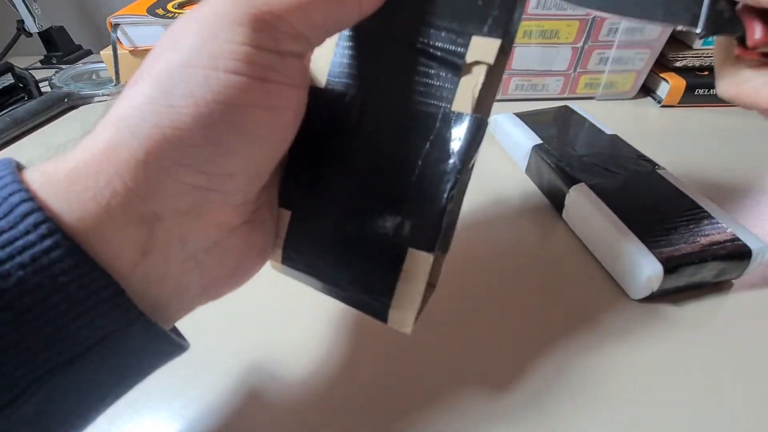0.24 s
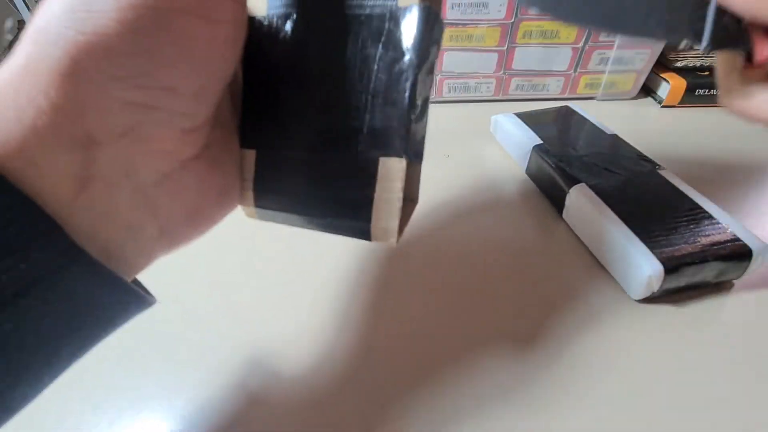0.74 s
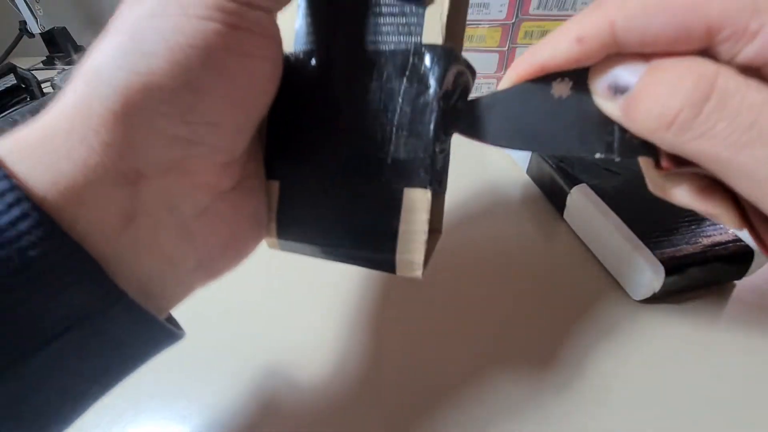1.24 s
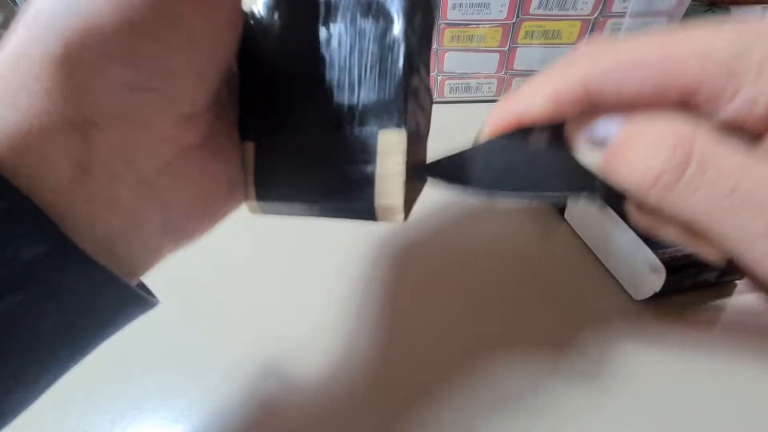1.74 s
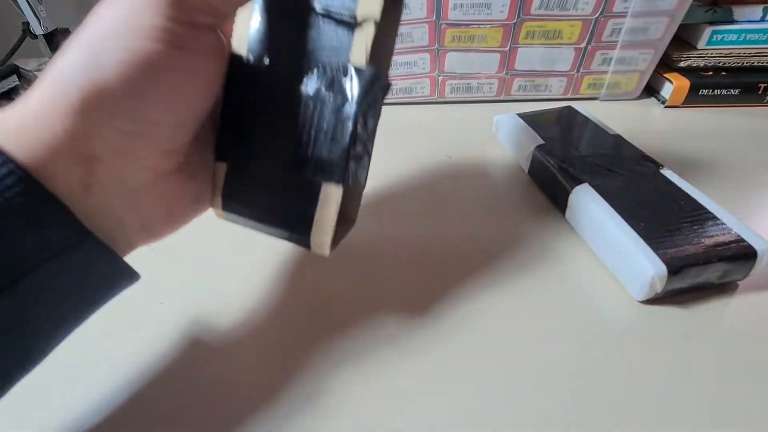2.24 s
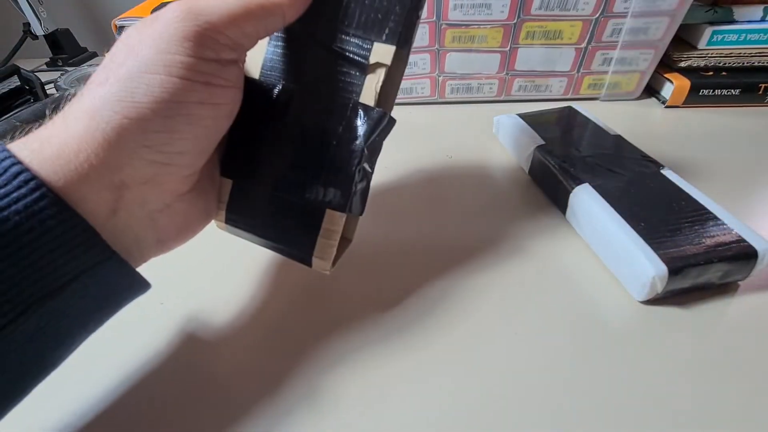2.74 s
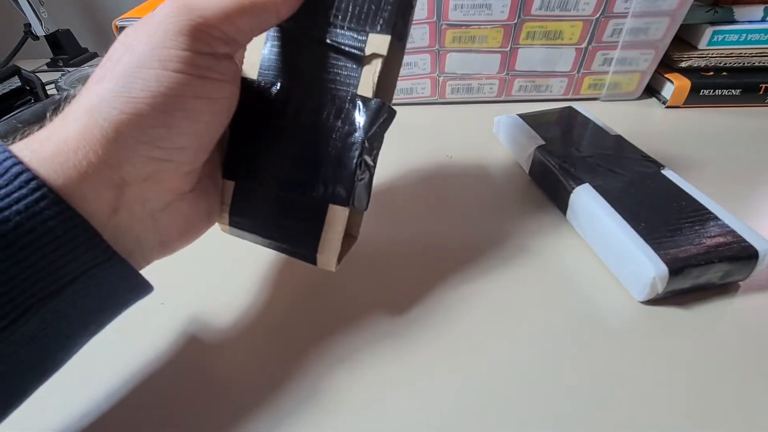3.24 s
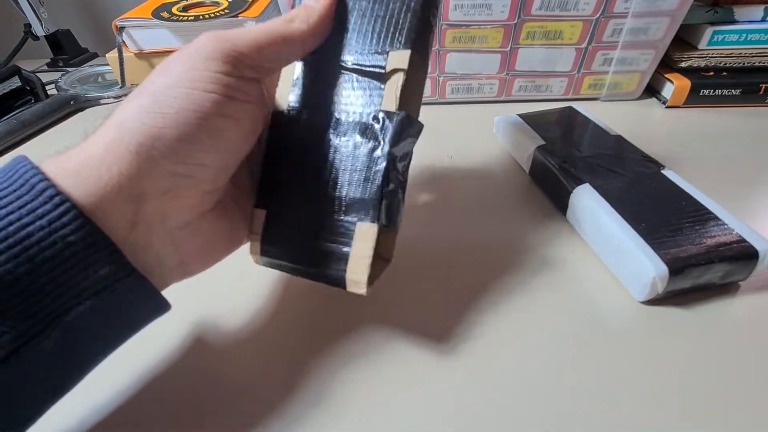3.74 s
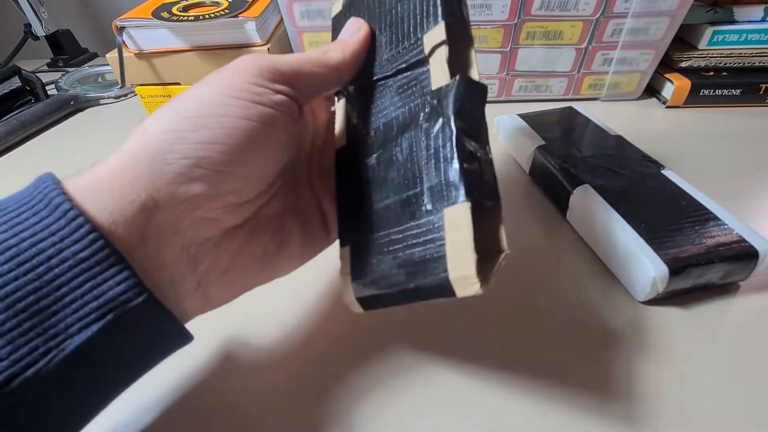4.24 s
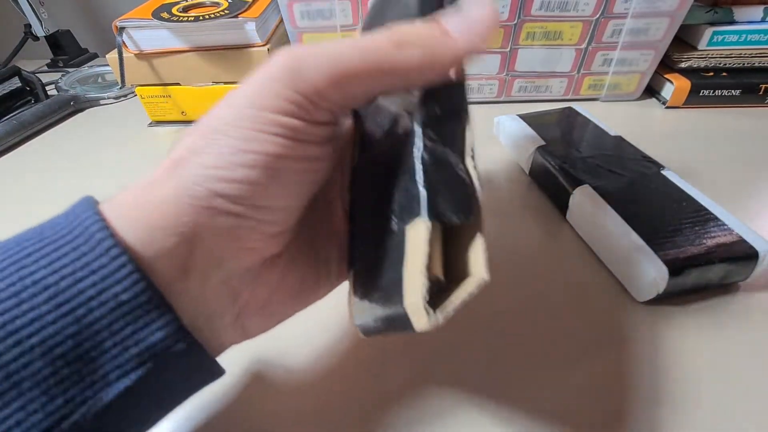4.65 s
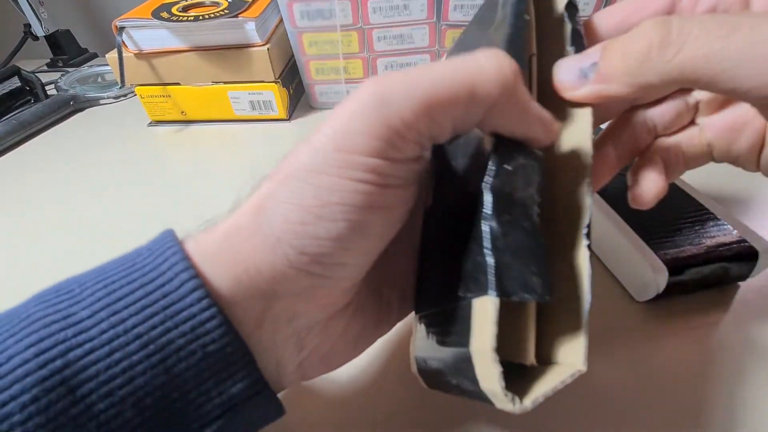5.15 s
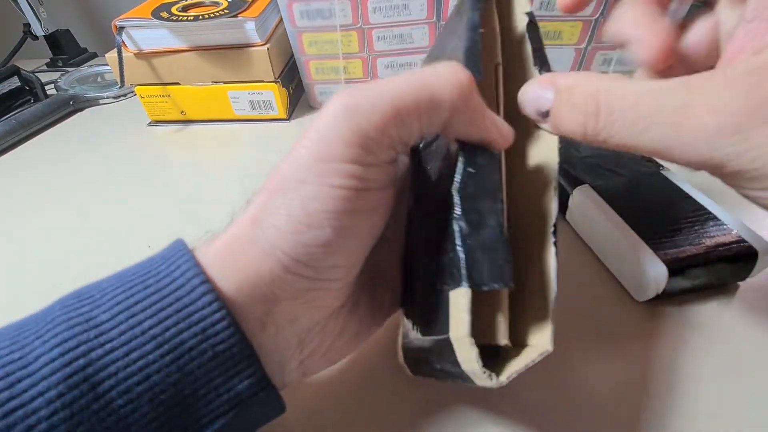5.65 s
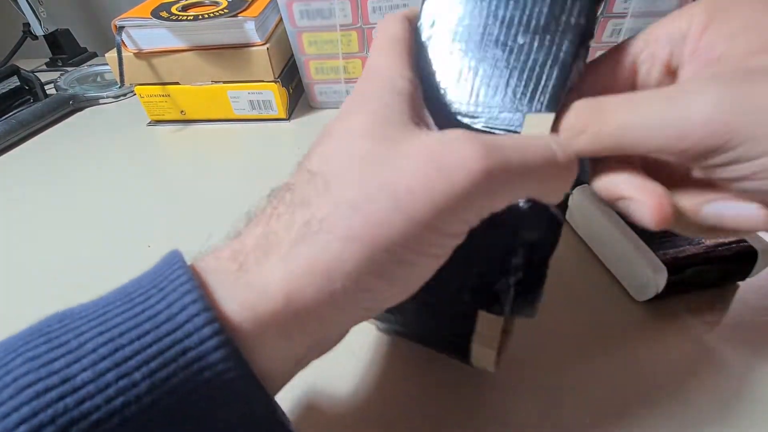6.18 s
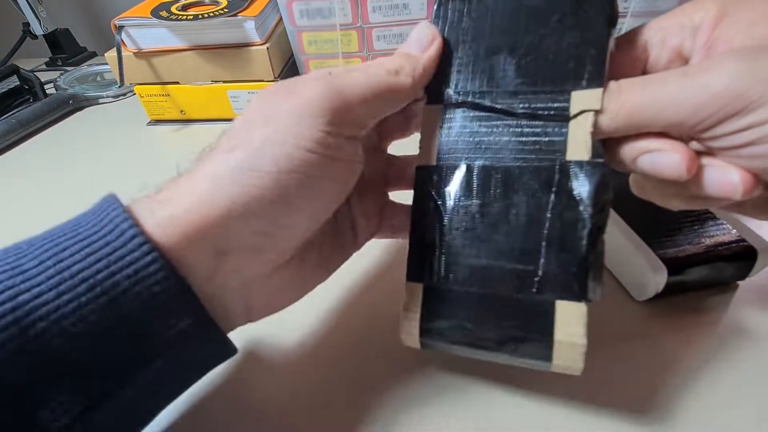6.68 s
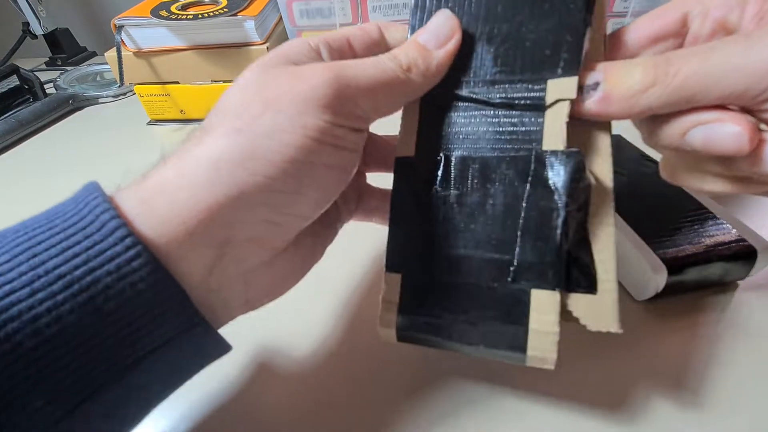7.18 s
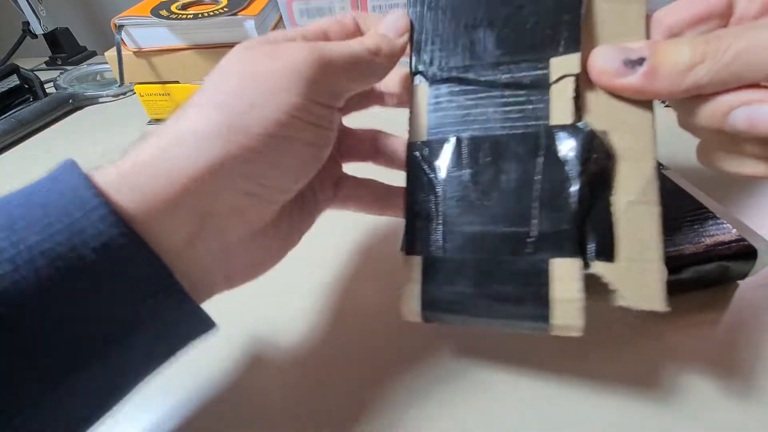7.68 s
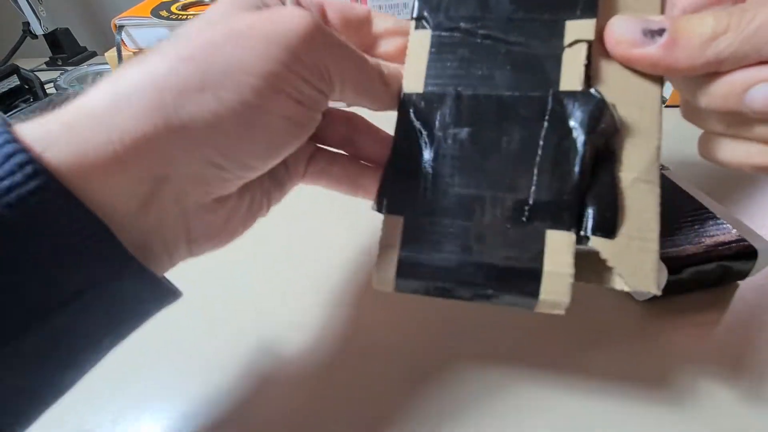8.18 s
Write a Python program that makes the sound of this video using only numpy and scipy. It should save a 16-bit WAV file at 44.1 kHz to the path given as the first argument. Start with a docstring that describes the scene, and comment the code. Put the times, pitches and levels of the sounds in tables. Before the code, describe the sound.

Close to a stereo microphone on a desk in a small room, a blade rips through tape on a cardboard sleeve in short bursts with a low bump. Another tearing stroke follows, then near quiet. A hard knife click and brief plasticky crinkle come next, then loud cracks as the card is pulled open, scratchy finger slides, and a last sharp rip with snaps and fading crackle.

```python
"""Opening a cardboard sleeve

A taped cardboard sleeve is slit with a knife and pulled open by hand, close to a stereo microphone on a desk.
Parting glue and fibres give dense random crackle; lone snaps come from them and from the knife being folded
and put down. Both excite damped resonances. Thin plastic crinkles as crackle weak in the lower panels;
rubs are noise narrowed to one sinking band. Jolts swing the desk as decaying sines; a small room answers
with a tail of noise; faint noise underlies all."""
import sys
import numpy as np
from scipy import signal
from scipy.io import wavfile

SR = 44100
rng = np.random.default_rng(int(sys.argv[2]) if len(sys.argv) > 2 else 0)


def ratio(d):
    """dB to gain"""
    e = np.asarray(d, float) / 20
    return 10 ** e


def unload_wav(signal):
    """Save mono or channel-first audio to the path in sys.argv[1] as 16-bit WAV at rate SR, clipped to [-1, 1]."""
    wavfile.write(
        sys.argv[1],
        SR,
        np.round(np.clip(np.atleast_2d(signal).T, -1, 1) * 32767).astype(np.int16),
    )


N = 371322  # length in samples

# Room air and microphone noise, relative spectral density: f/Hz, level/dB
AIR = [(15, -39), (25, -6), (76, 3.5), (200, -10), (293, -3.5), (560, -29.5), (2110, -27.5), (2610, -24.5),
       (6210, -29.5), (14800, -37.5), (16000, -36.5)]
AIR_DB = -61  # rms of the whole noise

# Lone snaps: t/s, level/dB, card flex re level/dB, tape tick re level/dB, card brightness/(dB per octave)
SNAPS = [(0.008, -33.5, -10.5, -5.5, 1), (0.1126, -36, -21.5, -17, 2.5), (0.215, -19.5, -47, -10.5, 7),
         (0.22, -22, -33, -10.5, -7), (0.232, -19.5, -19.5, -8, 7.5), (0.268, -22, -3.5, -15, -17.5),
         (0.276, -19.5, -8, -10.5, -1.5), (0.299, -39, -10, -23, -12), (0.47, -40.5, -23, -7, -2.5),
         (0.5349, -15.5, -43, -6, 6.5), (0.556, -8, -14, -13, 0), (0.579, -20.5, 1, -8, -8),
         (0.958, -44, -28, -16, -1), (1.21, -25, -26, -12.5, 2), (1.339, -48.5, -26, 3.5, 4),
         (1.472, -39.5, -28, -8, -0.5), (1.535, -44, -15, -13, -0.5), (1.685, -33, -15, -12, -1.5),
         (1.712, -20, -6.5, -8, 5), (1.723, -23.5, -10, -15, -16), (1.752, -15.5, -1, -5, -1.5),
         (1.904, -34, -12.5, -12, -0.5), (2.639, -57, -31, 8, 13), (2.727, -48.5, -42, 4, 16.5),
         (3.194, -21.5, -29.5, 7, 12.5), (3.586, -70, 36, -18.5, 9), (3.698, -2.5, -16, -11, -0.5),
         (3.922, -18, -19, -27, 1.5), (4.53, -43, -22, 1, 1), (4.545, -19.5, -2.5, -11.5, -6),
         (4.7009, -3.5, -14.5, -23, 1), (4.706, -1.5, -17.5, -19.5, 5), (4.7152, -11, -25.5, -5, -7),
         (5.011, -46.5, -30, 16, 12), (5.241, -40, -18, -34, -7), (5.3254, -5.5, -23, -10.5, -3),
         (5.3312, -17.5, -15, -2, 2), (5.436, -7, -12.5, -5, 1.5), (5.841, -24, -12.5, -15.5, -2),
         (5.903, -26, 0.5, -0.5, 7), (6.171, -23.5, 2.5, -3, -1), (6.488, -21, -18, -3, -2),
         (6.541, -24.5, -15, -36, -16), (6.566, -38, -13.5, -25, -15), (6.664, -35, -17.5, -15.5, 1),
         (6.976, -28, -21, -19.5, -0.5), (7.384, -18, -25, -17, -3), (7.422, -8.5, -10, -2, -5),
         (7.492, -4, -24, -5.5, -6), (7.5, -9, -11.5, -7, -2.5), (7.708, -30.5, -21, -14.5, -5.5),
         (7.78, -44.5, 2, -16.5, -6), (7.814, -41.5, -12.5, -10.5, -8.5), (7.874, -40.5, -17.5, -8, -5.5),
         (7.975, -40.5, -26.5, 3, -1), (8.019, -22.5, -17, -1.5, 0), (8.2, -34, -15.5, -16, -6),
         (8.237, -40, -24.5, -28, 12), (8.251, -35, -33, -17, -12), (8.276, -36, -23, -14, -11.5),
         (8.335, -40.5, -16, -5, 3), (8.375, -16, -15, -5, 2.5)]
SNAP_DECAY_MS = 2.91  # time constant of the slips

# Strongly damped card panels: f/Hz, width/Hz, level/dB
CARD = [(734, 171, 1.5), (978, 160, 3), (1219, 200, 1.5), (1490, 230, 1.5), (1740, 290, 3),
        (2130, 1300, -5.5), (3030, 664, 1.5), (3640, 720, -3.5), (4080, 1100, -13)]
# Bending of the sleeve: f/Hz, width/Hz, level/dB
FLEX = [(196, 144, -2.5), (411, 112.6, 1)]
# Skin of the tape: f/Hz, width/Hz, level/dB
FIZZ = [(4400, 3980, -3), (6690, 1700, 1), (8200, 2700, -13), (12800, 1700, -11.5)]

SHARED_POWER = 0.39  # of the crackle, heard alike by both ports; the rest leaves from the face turned to each
FLEX_ALIKE = 0.47  # the sleeve bends as one: share by which its sides are drawn together

# Place of the hands: t/s, lag of left port/samples, left re right level/dB
PLACE = [(0, -5, 4), (1.9, -5, 4.5), (2.2, 20, -6), (3.3, 16, -7), (3.6, 16, 0), (5.2, 16, -1),
         (5.3, -4, 2), (6.6, -3, 0), (8.42, -3, 4)]
SLEEVE_LOW_HZ = 144  # a small sleeve radiates little bass

# Decay of the room by band: f/Hz, T60/s, level/dB
ROOM_TAIL = [(150, 0.14, -7), (470, 0.44, -1.5), (1670, 0.5, -3.5), (3640, 0.25, -3), (8900, 0.058, 9.5)]
ROOM_DB, ROOM_FILL_S = -12, 0.0015

# Cuts, the blade running through tape at an even pull: t of start/s, length/s, crackle level/dB,
# tape fizz re crackle/dB
CUTS = [(0.165, 0.041, -44.5, -9), (0.208, 0.083, -40, -7.5), (0.534, 0.018, -20.5, -10),
        (0.581, 0.033, -26, -8), (0.632, 0.069, -39.5, -14.5)]
CUT_RISE_S, CUT_FALL_S = 0.01, 0.011  # time per 20 dB
# Tears, which jolt the whole sleeve: t of peak/s, crackle level/dB, rise by 20 dB/s, fall by 20 dB/s,
# tape fizz re crackle/dB (rise and fall are held to at least 3 ms)
TEARS = [ (1.178, -38, .09, .016, -11), (1.72, -26, -0.2554, 0.0686, -3), (1.8, -53, 0.23, 0.27, -11.5),
         (4.553, -37, -0.2, 0.3, -28.5), (4.74, -19.5, 0, 0.2, -19.5), (5.47, -44, 0.36, 0.07, -8),
         (5.9, -42, 0, 0.08, -3), (6.55, -56.5, 1.5, 0.4, -8.5), (7.418, -27.5, 0.07, 0.1076, -3),
         (7.53, -46, 0.26, 0.28, -8), (8.02, -51, 0.18, 0.53, -10)]
# Slides of blade or finger along the tape, which hardly bend the sleeve: columns as for the tears
SLIDES = [(0.97, -60, .015, .06, -10.5), (1.03, -62.5, .015, .07, -8.5), (1.545, -56.5, 0.014, 0.054, -8),
          (8.13, -57.5, 0.038, .04, -2.5), (5.05, -52.5, .15, 0.13, -17.5), (5.15, -39, 0.036, 0.022, -6.5),
          (5.38, -49, 0.16, .15, -6), (5.705, -44.5, 0.073, 0.025, -7), (6.0, -46.5, .015, 0.22, -6),
          (6.15, -41, 0.14, 0.28, -8), (6.37, -43.5, 0.2, .06, -11), (6.82, -54, 0.087, 0.053, -8.5),
          (7.05, -41, 0.065, .15, -11.5), (7.18, -28, 0.15, 0.059, -4)]
# Crinkles of thin plastic, weak in the lower panels: columns as for the tears
CRINKLES = [(2.5, -69.5, .6, .7, -1), (3.24, -57, .06, 0.15, 5.5), (3.43, -67.5, 0.087, 0.069, 6),
            (3.75, -22.5, .045, 0.18, -23.5), (3.97, -39.5, .2, 0.5, -21), (4.21, -34, .05, 0.092, -31)]
TEAR_FLEX_DB, SLIDE_FLEX_DB, CRINKLE_FLEX_DB = -7, -18, -16.5  # bending re crackle
CRINKLE_THIN_DB = 6.5  # loss per octave down the lower panels
FIZZ_EXTRA_FALL = 0.74  # extra fall of the fizz, as a share of the crackle's fall
SHOULDER, SLIDE_SHOULDER = 0.91, 1.35  # above 1 the peak of a stroke is rounded

# Jolts into the desk: t/s, level/dB, f/Hz
THUMPS = [(0.289, -42, 53), (0.741, -37.5, 73.4), (1.859, -36, 56.9), (5.99, -44.5, 122.7),
          (8.371, -43.5, 56.4), (0.566, -19, 81.3), (0.599, -22.5, 61.6), (1.19, -35.5, 57.6),
          (1.764, -20.5, 66.5), (4.541, -48, 86), (4.731, -32, 80), (5.435, -41, 109), (5.898, -41, 101),
          (6.291, -38.5, 77), (7.495, -23, 66.3), (7.713, -38, 60.7), (7.999, -36.5, 97)]
THUMP_T60_S, THUMP_LAG_S = 0.24, 0.0007  # the right port feels it later

# Rubs that make one panel sing out of the crackle: t of start/s, length/s, f/Hz, level/dB
RUBS = [(2.445, .12, 6280, -66.5), (3.234, 0.16, 1670, -66.5), (3.245, 0.13, 4680, -60.5),
        (3.716, 0.077, 2083, -34), (4.048, 0.14, 982, -45.5), (4.06, 0.068, 1507, -50),
        (4.19, 0.145, 1490, -48), (4.551, 0.11, 399, -42), (5.125, 0.041, 1090, -42),
        (7.115, 0.11, 831, -40), (7.09, 0.13, 3446, -38)]
RUB_SHARPNESS = 11  # pitch over width
RUB_EDGE_S = 0.01  # scale of fade in and out
RUB_SAG, RUB_WANDER = 0.042, 0.02  # shares by which the pitch sinks over the length and wanders
RUB_FADE_DB = 8  # loss over the length


def rms_one(x):
    """Normalization of a signal to unit rms."""
    return x / np.sqrt(np.mean(x ** 2) + 1e-20)


def in_time(rows):
    """Linear interpolation of every column of a curve at each sample."""
    s, *columns = np.transpose(rows)
    return [np.interp(np.arange(N) / SR, s, column) for column in columns]


def drift(rate_hz):
    """Low-pass random process of unit rms: white noise through a double real pole, run at SR / 40."""
    r = np.exp(-80 * np.pi * rate_hz / SR)
    white = rng.standard_normal(N // 40 + 2002)
    slow = signal.lfilter([1], [1, -2 * r, r * r], white)[2000:]  # settled part
    return np.interp(np.arange(N) / 40, np.arange(len(slow)), rms_one(slow))


def resonate(x, hz, width_hz):
    """Damped oscillator: a pole pair whose radius sets the bandwidth, with about unit gain at resonance."""
    r = np.exp(-np.pi * abs(width_hz) / SR)
    zeros = [(1 - r * r) / 2, 0, (r * r - 1) / 2]
    poles = [1, -2 * r * np.cos(2 * np.pi * hz / SR), r * r]
    return signal.lfilter(zeros, poles, x + 1e-18)


def body(modes, drive):
    """Modal superposition: steep parallel resonances of alternating sign, each with its own drive."""
    total = 0
    for k, (hz, width_hz, db) in enumerate(modes):
        octave = np.log2(hz / 1600)
        narrow = resonate(drive(octave), hz, width_hz)
        total = total + (-1) ** k * ratio(db) * resonate(narrow, hz, 3 * width_hz)
    return total


def two_faces(shape):
    """Partial coherence: left and right noise share a part of their power."""
    shared, left, right = rng.standard_normal((3, *shape))
    alike = np.clip(SHARED_POWER, 0, 1)
    return np.sqrt(alike) * shared + np.sqrt(1 - alike) * np.array([left, right])


def as_one(x):
    """Common motion of a bending sheet: left and right are drawn towards their mean."""
    return x + np.clip(FLEX_ALIKE, 0, 1) * (x.mean(axis=0) - x)


def air(patchy_db=3.5, alike_hz=300):
    """Diffuse noise in flickering half-octave bands, whose coherence between sides falls with frequency."""
    out, edges = 0, 25 * 2 ** np.arange(0, 9.6, 0.5)
    white = rng.standard_normal((2, 2, N))
    at_hz, level_db = np.transpose(AIR)
    for k, (low, high) in enumerate(zip(edges, edges[1:])):
        band = signal.butter(2, [low, high], "band", fs=SR, output="sos")
        mid, side = signal.sosfilt(band, white[k % 2])
        hz = np.sqrt(low * high)
        alike = 1 / (1 + hz / alike_hz)
        gain = ratio(np.interp(np.log(hz), np.log(at_hz), level_db) + patchy_db * drift(22))
        out = out + gain * (np.sqrt(1 + alike) * mid + np.sqrt(1 - alike) * side * [[1], [-1]])
    return ratio(AIR_DB) * rms_one(out)


def snaps(ragged_db=7.5, card_db=6.5, flex_db=23.5, tick_db=5.5):
    """Impulsive excitation: ragged bursts of noise strike each resonance with a strength of its own."""
    s, level_db, low_db, high_db, bright_db = np.transpose(SNAPS)
    t, spread_db = np.arange(-1200, 2000), 2.0  # t in samples
    decay = np.maximum(np.tile(t / (SNAP_DECAY_MS * SR / 1000), (len(s), 1)), 0)
    # A faint swell of noise leads into each snap
    lead_in_db, lead_in_s = -25, 0.005
    lead_in = ratio(lead_in_db) * np.exp(np.minimum(t, 0) / (lead_in_s * SR)) * (t < 0)
    shape = lead_in + (1 - np.exp(-5.0 * decay)) * np.exp(-decay)
    bursts = two_faces(shape.shape) * shape * ratio(ragged_db * rng.standard_normal(shape.shape))
    # Each burst gets the energy of its smooth shape
    energy_ratio = np.sum(shape ** 2, axis=-1) / np.sum(bursts ** 2, axis=-1)
    bursts = bursts * np.sqrt(energy_ratio)[..., None]
    at = np.clip(np.round(s * SR).astype(int)[:, None] + t, 0, N - 1).ravel()

    def strikes(strike_db):
        """Superposition of all bursts on the time axis, their strengths drawn afresh."""
        gain = ratio(strike_db + rng.normal(0, spread_db, len(s)))[:, None]
        return np.array([np.bincount(at, (side * gain).ravel(), N) for side in bursts])

    tilt_db = np.clip(bright_db, -12, 12)
    card = body(CARD, lambda octave: strikes(level_db + card_db + tilt_db * octave))
    flex = body(FLEX, lambda octave: strikes(level_db + low_db + flex_db))
    tick = body(FIZZ, lambda octave: strikes(level_db + high_db + tick_db))
    return card + as_one(flex) + tick


def room(x):
    """Reverberation: convolution with diffuse noise that fills up, then dies exponentially band by band."""
    t, tail = np.arange(SR) / SR, 0
    white = rng.standard_normal((2, SR))
    for hz, t60_s, level_db in ROOM_TAIL:
        edges = [hz / np.sqrt(3), hz * np.sqrt(3)]
        band = signal.butter(1, edges, "band", fs=SR, output="sos")
        tail = tail + signal.sosfilt(band, white) * ratio(level_db - 60 * t / t60_s)
    tail = tail * (1 - np.exp(-(t / ROOM_FILL_S) ** 2))
    tail = tail / np.sqrt(np.sum(tail ** 2, axis=1, keepdims=True))
    return signal.fftconvolve(x, tail, axes=1)[:, :N]


def strokes():
    """Incoherent addition of strokes: gives crackle/dB, flex and fizz re crackle/dB, crinkle power share."""
    t = np.arange(0, N, 40) / SR
    steady = np.ones(len(t))
    power = np.full((4, len(t)), 1e-14)  # crackle, flex, fizz, crinkle
    cuts = [(s, db, CUT_RISE_S, CUT_FALL_S, fizz_db, length) for s, length, db, fizz_db in CUTS]
    kinds = ((cuts, TEAR_FLEX_DB, 0, SHOULDER), (TEARS, TEAR_FLEX_DB, 0, SHOULDER),
             (SLIDES, SLIDE_FLEX_DB, 0, SLIDE_SHOULDER), (CRINKLES, CRINKLE_FLEX_DB, 1, SHOULDER))
    for rows, flex_db, thin, shoulder in kinds:
        for s, peak_db, rise_s, fall_s, fizz_db, *hold_s in rows:
            distance_s = np.maximum([s - t, t - s - sum(hold_s)], 0)
            before, after = (distance_s / np.maximum([[rise_s], [fall_s]], 0.003)) ** shoulder
            swell = ratio(peak_db - 20 * (before + after))
            parts = ratio([[0], [flex_db], [fizz_db], [0]])
            fizz_fall = ratio(np.maximum(-20 * FIZZ_EXTRA_FALL * after, -20))
            power += (swell * parts * [steady, steady, fizz_fall, thin * steady]) ** 2
    crackle, flex, fizz = 10 * np.log10(power[:3])
    return in_time(np.transpose([t, crackle, flex - crackle, fizz - crackle, power[3] / power[0]]))


def tearing(card_follows=0.84, even_db=-12.0):
    """Random clumped impulses of parting glue; a fizzier pull also drives the higher panels harder."""
    crackle_db, flex_db, fizz_db, crinkle = strokes()
    bright_db = card_follows * (fizz_db - even_db)  # per octave
    per_s, spread_db, clump_db, waver_db = 7000, 1.8, 1.3, 2.5
    sizes = ratio(spread_db * np.minimum(rng.exponential(1, N), 5)) * two_faces((N,))
    grains = sizes * (rng.random(N) < per_s / SR) * ratio(clump_db * drift(17))

    def card_drive(octave):
        """Spectral tilt: brightness acts above 1600 Hz, thinness of plastic below."""
        tilt_db = bright_db * max(octave, 0) + crinkle * CRINKLE_THIN_DB * min(octave, 0)
        return grains * ratio(waver_db * drift(21) + tilt_db)

    def wavering(octave):
        """Amplitude modulation of the grains by a slow random level."""
        return grains * ratio(waver_db * drift(36))

    card = rms_one(body(CARD, card_drive))
    flex = rms_one(body(FLEX, wavering))
    fizz = rms_one(body(FIZZ, wavering))
    return ratio(crackle_db) * (card + ratio(flex_db) * as_one(flex) + ratio(fizz_db) * fizz)


def desk_thumps(rise_s=0.0009):
    """Damped free vibration: the desk top swings a few low cycles after each jolt."""
    out, t = np.zeros(N + SR), np.arange(SR // 2) / SR
    shape = (1 - np.exp(-t / rise_s)) * ratio(-60 * t / THUMP_T60_S)
    for s, level_db, hz in THUMPS:
        at = round(s * SR)
        out[at:at + len(t)] += ratio(level_db) * shape / shape.max() * np.sin(2 * np.pi * hz * t)
    return out[:N]


def rubs(waver_db=3.5):
    """Friction noise narrowed to one band that sinks, wanders and breaks up as the rub weakens."""
    out, t = np.zeros((2, N)), np.arange(N) / SR
    in_phase, quadrature = two_faces((N,)), two_faces((N,))
    waver, wander = ratio(waver_db * drift(40)), RUB_WANDER * drift(15)
    for s, length, hz, level_db in RUBS:
        part = slice(round((s - 0.05) * SR), round((s + length + 0.05) * SR))
        u = t[part] - s
        narrow = signal.butter(2, hz / max(RUB_SHARPNESS, 2) / 2, fs=SR, output="sos")
        # Phase is the integral of the moving pitch; it carries the low-passed noise up to that pitch
        sag = RUB_SAG * (u / 2 - u * u / (2 * length))
        phase = 2 * np.pi * hz * (u + sag + np.cumsum(wander[part]) / SR)
        band = (signal.sosfilt(narrow, in_phase[:, part]) * np.cos(phase)
                + signal.sosfilt(narrow, quadrature[:, part]) * np.sin(phase))
        fade_in = (np.maximum(-u, 0) * 4 / RUB_EDGE_S) ** 2
        fade_out = np.maximum(u - length, 0) / RUB_EDGE_S
        held = np.exp(-fade_in - fade_out)
        out[:, part] += ratio(level_db - RUB_FADE_DB * u / length) * rms_one(band) * held * waver[part]
    return out


def scene():
    """Differences of time and level between the ports place the sleeve; room, thumps and air are added."""
    lag, pan_db = in_time(PLACE)
    high_pass = signal.butter(2, SLEEVE_LOW_HZ, "high", fs=SR, output="sos")
    sleeve = signal.sosfilt(high_pass, snaps() + tearing() + rubs())
    heard = ratio(ROOM_DB) * room(sleeve)
    for side, sign in enumerate((0.5, -0.5)):  # left, right
        late = np.clip(np.arange(N) - np.round(sign * lag).astype(int), 0, N - 1)
        heard[side] += ratio(sign * pan_db) * sleeve[side][late]
    desk = desk_thumps()
    desk_sides = np.array([desk, np.roll(desk, round(THUMP_LAG_S * SR))])
    return heard + desk_sides * ratio([[-2], [1.5]]) + air()


def roll_off(x):
    """The treble ends steeply here."""
    return signal.sosfilt(signal.butter(12, 16510, fs=SR, output="sos"), x)


def record(dry):
    """Band limitation and saturation: a steep low-pass cuts the top and peaks clip at full scale."""
    low_pass = signal.cheby2(10, 60, 17000, fs=SR, output="sos")
    mix = np.clip(signal.sosfilt(low_pass, dry), -1, 1)
    return roll_off(mix)


dry = scene()
out = record(dry)
unload_wav(out)
```